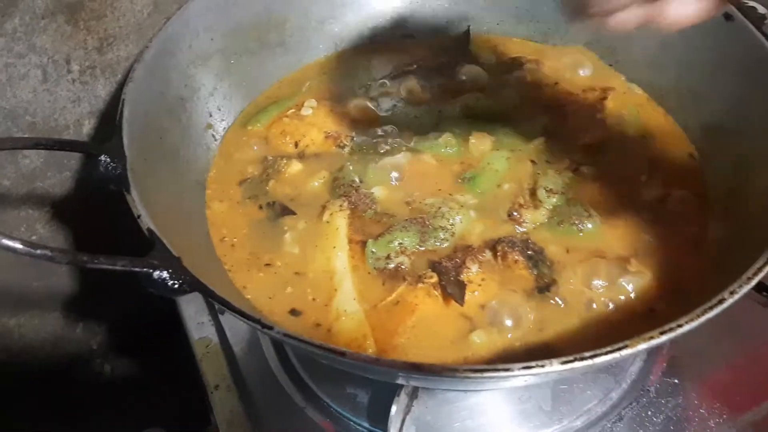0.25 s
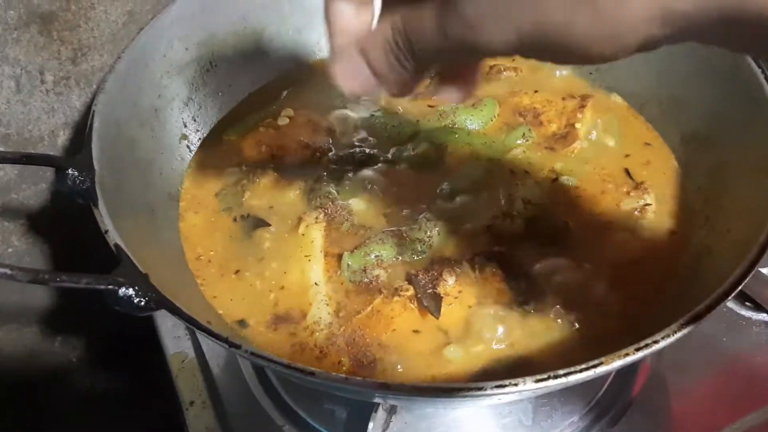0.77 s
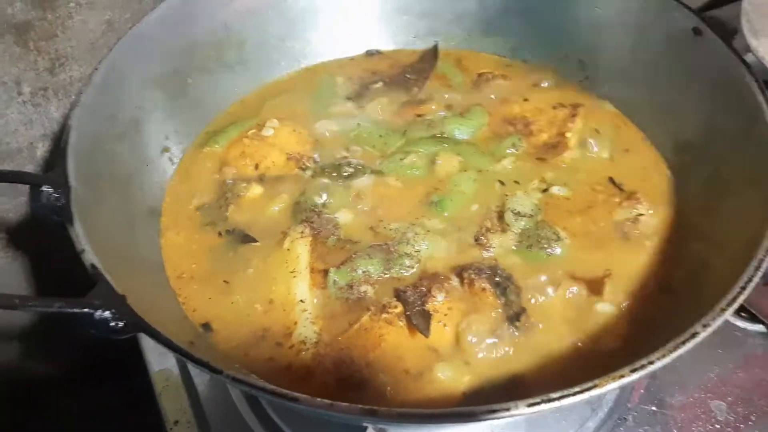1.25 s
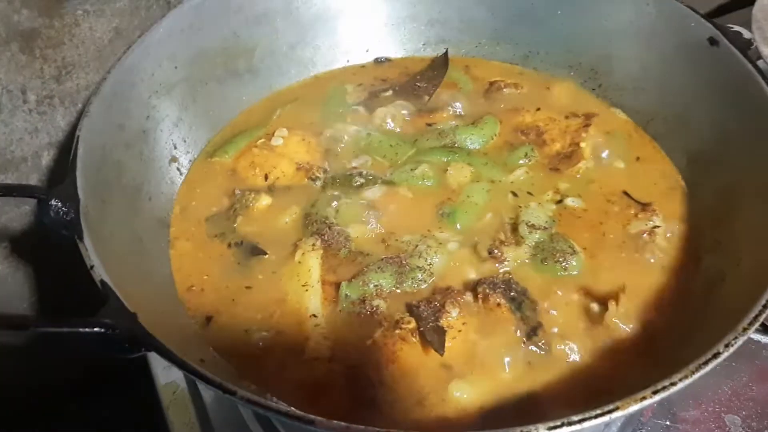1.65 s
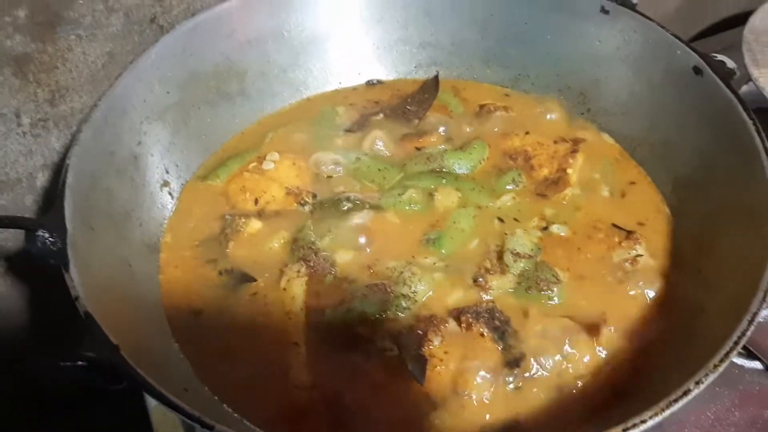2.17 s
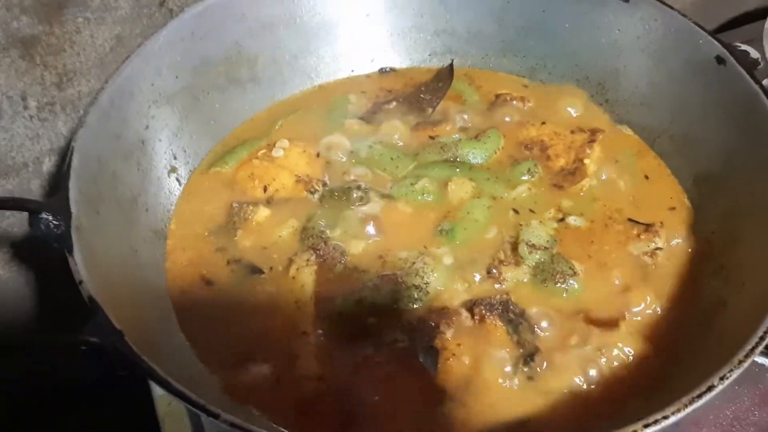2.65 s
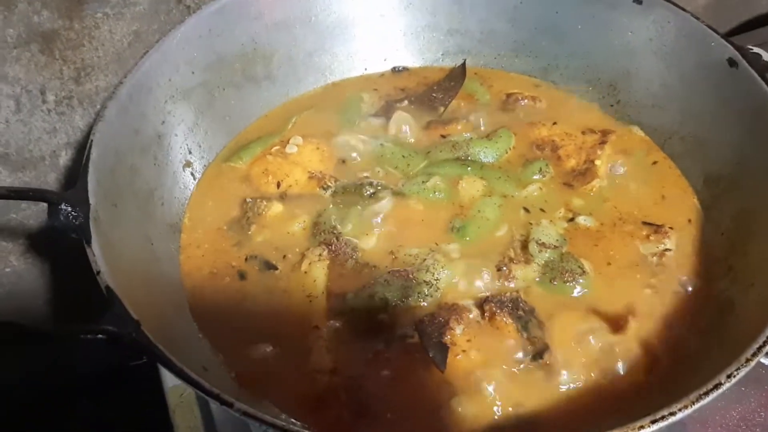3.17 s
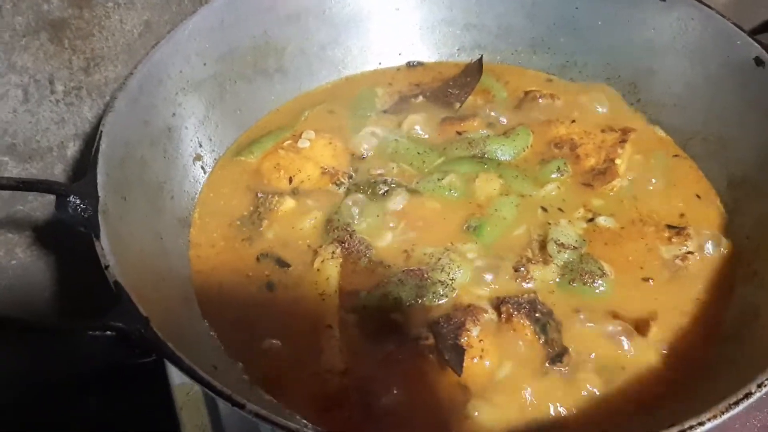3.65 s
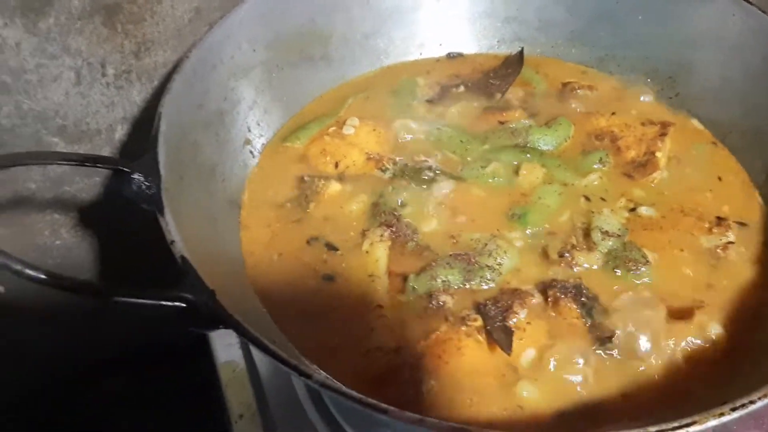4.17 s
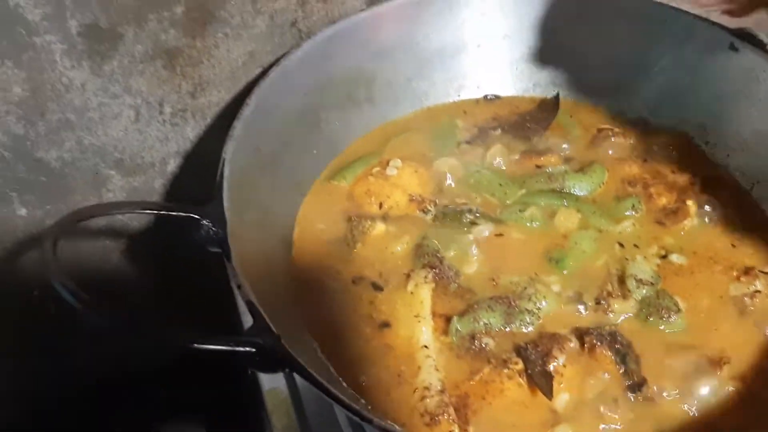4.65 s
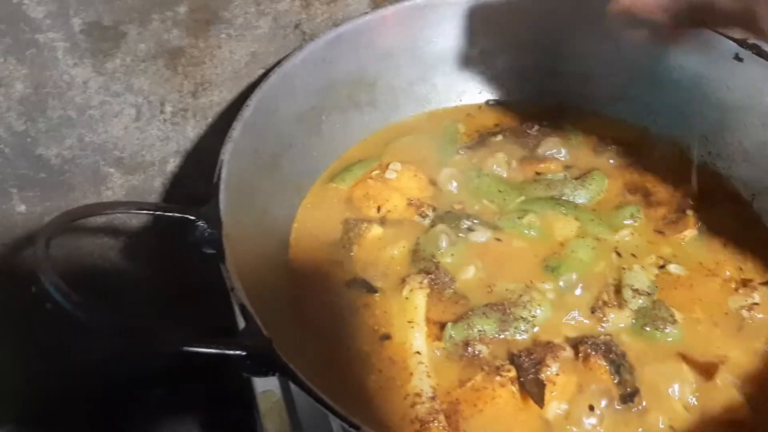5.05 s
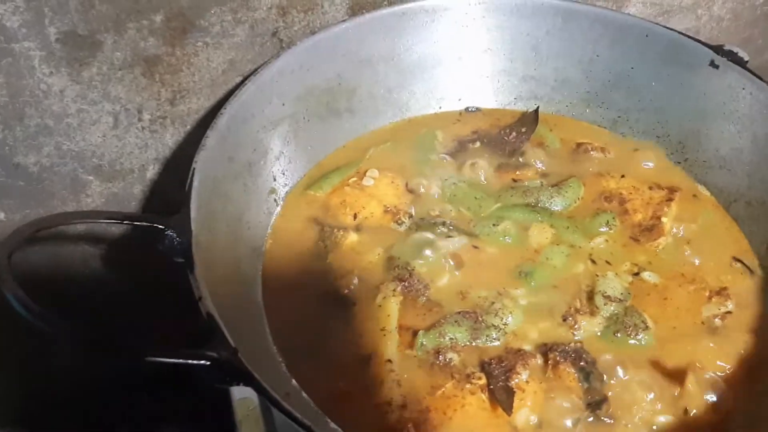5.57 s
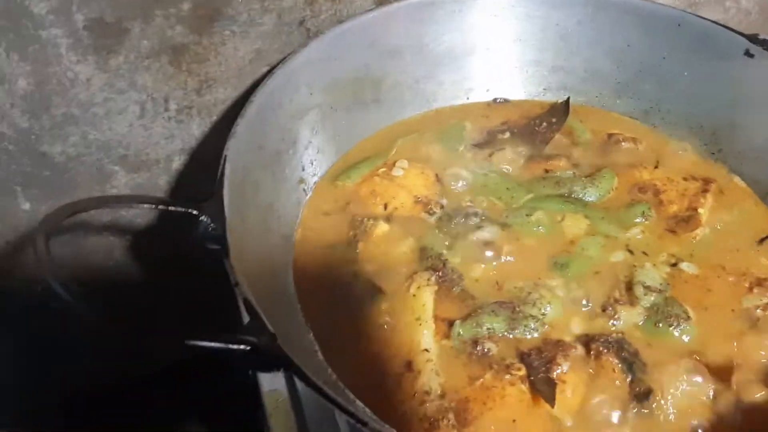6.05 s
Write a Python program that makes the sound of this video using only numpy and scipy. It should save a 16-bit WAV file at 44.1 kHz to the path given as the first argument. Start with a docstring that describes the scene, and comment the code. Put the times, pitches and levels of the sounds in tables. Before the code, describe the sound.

A thin curry simmers in a metal pan close to the microphone, in a small kitchen with hard walls. Bubbles burst with short, wet pops over a steady sizzle, droplets spit, and a gas flame rumbles faintly underneath. From about two seconds in, five dull knocks and a few light taps come from across the room. The sizzle grows a little in the second half, and air briefly buffets the microphone near the end.

```python
"""Curry simmering in a pan

A thin curry simmers in a metal pan on a gas burner in a small kitchen with hard walls.
Bubbles burst with short pitched pops, droplets spit, sauce sizzles at the rim and the flame rumbles.
Five dull knocks and a few light taps from across the room ring in the walls.
Now and then a puff of air buffets the microphone."""
import sys
import numpy as np
from scipy import signal
from scipy.io import wavfile

SR = 44100
rng = np.random.default_rng(int(sys.argv[2]) if len(sys.argv) > 2 else 0)


def persist_wave(psi):
    """Save psi, clipped to +-1, as 16-bit WAV."""
    counts = np.round(np.clip(psi, -1, 1) * 32767).astype(np.int16)
    wavfile.write(sys.argv[1], SR, np.atleast_2d(counts).T)


N = 278258
TIME = np.arange(N) / SR

# the loudest bursting bubbles: t/s, level/dB, f/Hz
POPS = [(0.05, -29.5, 1900), (0.186, -25, 1980), (0.221, -28, 1760), (0.287, -29.5, 1530),
        (0.659, -29.5, 1300), (0.981, -25, 1740), (1.214, -31, 2070), (1.329, -28, 930),
        (1.41, -29.5, 1730), (1.442, -27.5, 1200), (1.621, -29, 1950), (1.681, -25, 1960),
        (2.078, -28, 1540), (2.579, -34, 1520), (2.623, -23.5, 1500), (2.776, -26.5, 1550),
        (3.365, -23, 1540), (3.516, -25, 1990), (4.167, -24, 1850), (4.621, -33, 1580),
        (4.897, -25.5, 1850), (5.202, -25.5, 2030), (5.351, -35, 2050), (5.372, -25, 1970),
        (5.468, -26, 2040), (5.591, -28, 1270), (5.647, -26.5, 1550), (5.842, -25.5, 2100)]
# the pitches that quieter pops gather round: f/Hz
POP_PITCHES = [980, 1240, 1510, 1673, 2010]
# how loud the small bubbles are at each pitch: f/Hz, level/dB
BUBBLE_LEVELS = [(450, -8.5), (700, -4), (950, 5.5), (1400, 4), (2050, 5.5), (2600, -4), (4000, -5),
                 (6000, -5.5)]
# the loudest droplets spitting on hot metal: t/s, level/dB, f/Hz
SPITS = [(0.1039, -27.5, 3420), (0.365, -34, 4660), (1.4621, -32, 2970), (1.5244, -34.5, 7000),
         (2.5024, -30.5, 4570), (2.578, -31, 5950), (2.8738, -35, 4080), (2.944, -31.5, 3560),
         (3.2999, -33, 3300), (3.4148, -30, 5670), (4.4733, -31.5, 3940), (4.6223, -28.5, 4600),
         (4.9833, -32.5, 3380), (5.1174, -28.5, 7000), (5.384, -29.5, 2630), (5.8568, -30, 2680)]
# the loudest cracks of oil: t/s, level/dB
OIL_CRACKS = [(0.957, -37), (1.9889, -38), (3.5997, -29), (5.0543, -31), (5.596, -35), (5.885, -31.5)]
# how hard the sauce fries at the rim: t/s, sizzle level/dB, fine spray level/dB
SIMMER = [(0.0, -56.5, -67.5), (0.7, -65.5, -67), (1.03, -61.5, -63.5), (1.69, -60.5, -64.5),
          (2.78, -54.5, -61.5), (3.48, -51.5, -60), (3.62, -52.5, -62), (3.97, -56, -60.5),
          (4.2, -54, -63.5), (4.41, -49.5, -66), (4.64, -52.5, -57), (4.83, -47.5, -51), (5.01, -49, -57.5),
          (5.24, -54, -59), (5.43, -60, -70), (5.61, -52.5, -65), (5.97, -53, -60.5), (6.31, -52.5, -70)]
# the sizzle's colour (how strong a noise is from low to high): f/Hz, level/dB
SIZZLE_COLOUR = [(500, -19), (1500, 2.5), (3000, 3), (4500, -1), (6500, -8.5), (8500, -19), (16000, -19)]
# the colour of the fine spray: f/Hz, level/dB
SPRAY_COLOUR = [(3000, -8), (6000, -2), (8500, -10.5), (11500, 1), (16000, -12)]
# sauce lapping onto the hot pan wall: t/s, level/dB, fading time/s
SPURTS = [(2.51, -58, 0.1), (2.656, -51, 0.074), (3.02, -48, 0.039), (3.165, -46, 0.042),
          (3.328, -46, 0.039), (5.04, -50.5, 0.16), (5.405, -50, 0.067)]
# knocks: t/s, level/dB, treble lift/dB, ring level/dB, build-up/s, hold/s, first thud f/Hz
KNOCKS = [(1.900, -27, -11.5, -4.5, 0.0037, 0.023, 430), (3.070, -27.5, -15.5, -3, 0.0034, 0.025, 446),
          (3.540, -25, -7, -3.5, 0.00062, 0.07, 272), (4.2551, -21.5, 1.5, 0.5, 0.00053, 0.056, 415),
          (6.095, -25.5, -8.5, -3, 0.01, 0.045, 230)]
# the notes of every knock: f/Hz, level/dB, t60/s (the time to fade by 60 dB)
KNOCK_NOTES = [(224.5, -0.5, 0.63), (267, -14, 0.65), (327.3, 0, 0.47), (343, -4.5, 0.54),
               (388, -8.5, 0.54), (439.6, 4, 0.31), (466, -16, 0.26), (607, 1.5, 0.3), (670, 3, 0.31),
               (770, -11, 0.4), (828, -14, 0.44), (840, -32, 0.44), (1120, -17, 0.73), (1250, -3.5, 0.32)]
# the colour of a knock's echo: f/Hz, level/dB
KNOCK_COLOUR = [(100, -26), (160, -8), (240, -6), (420, 1), (520, -14.5), (700, 1), (1100, -7.5),
                (2100, -12), (3500, -14.5), (5500, -19), (8000, -28), (12000, -23.5), (16000, -40)]
# the colour of the splintering as a knock lands: f/Hz, level/dB
CRUNCH_COLOUR = [(800, -52), (2000, 12.5), (4000, -6), (6000, -7), (8500, -12), (12000, -11), (16000, -17)]
# light ticks of a utensil: t/s, level/dB, f/Hz, width/Hz, t60/s, echo level/dB
CLICKS = [(2.241, -20.5, 13400, 6000, 0.009, -2), (2.299, -25, 11600, 5000, 0.038, -6)]
# the notes of a tap of kitchenware: f/Hz, width/Hz, level/dB
TAP_NOTES = [(1510, 1200, -33), (2230, 170, -30), (2640, 190, -43), (3770, 2200, -57)]
# the colour of the gas flame: f/Hz, level/dB
FLAME_COLOUR = [(22, -26), (40, -16), (60, 0), (80, 3), (122, -2), (160, -17), (220, -2), (320, -13),
                (450, -5.5), (560, -25.5), (850, -13), (2000, -24), (4000, -49)]
# puffs of air: t/s, level/dB, half length/s
PUFFS = [(2.80, -36, 0.08), (5.693, -21.5, 0.02), (5.782, -19, 0.019), (5.894, -24, 0.038)]
# the colour of a puff: f/Hz, level/dB
PUFF_COLOUR = [(22, -28), (45, -8), (65, 3.5), (110, 3.5), (165, 4), (260, -15.5), (450, -22.5),
               (1000, -96)]
# how long the kitchen echoes: f/Hz, t60/s
ROOM_T60 = [(200, 0.57), (700, 0.35), (2000, 0.15), (6000, 0.18), (14000, 0.16)]
# the colour of that echo: f/Hz, level/dB
ROOM_COLOUR = [(100, -29), (2000, 5.5), (6000, 6.5), (16000, 4)]
# how alike left and right sound: f/Hz, likeness (1 = the same)
LIKENESS = [(60, 0.94), (300, 0.96), (550, 0.61), (900, 0.13), (2000, 0), (4000, 0), (16000, 0)]
# how much of a treble lift each pitch gets: f/Hz, share
TREBLE_SHARE = [(400, 0.1), (2000, 0.27), (10000, 0.93)]


def burst(hz, cycles, rise, snap, snap_cycles=2.1, snap_width=0.28):
    """A bubble's skin tears with a wet snap; the hollow rings and rises in pitch as its hole widens."""
    t = TIME[:SR // 40]
    age = t * hz / cycles   # reaches 1 when the ring has faded by 60 dB
    pitch_hz = hz * (1 + rise * (1 - 2 * np.exp(-age * 6)))
    ring = np.sin(2 * np.pi * np.cumsum(pitch_hz) / SR) * from_db(-60 * age)
    tear = rms_one(resonance(rng.standard_normal(len(t)), hz, snap_width * hz))
    return ring + snap * tear * np.exp(-t * hz / snap_cycles)


def big_bubbles(cycles=33.4, splash_db=-11.0, splash_s=0.025, detune=0.043, pan_db=5.5):
    """Loud pops stand out among quieter ones; three smaller bubbles burst just after each."""
    out, quiet = np.zeros((2, N)), []
    for s, db, draw in scattered(count=52, db=-32.5, spread_db=1.5):
        hz = POP_PITCHES[int(np.sqrt(draw) * len(POP_PITCHES))]   # higher pitches come up more often
        quiet.append((s, db, hz * np.exp(detune * rng.standard_normal())))
    for s, db, hz in list(POPS) + quiet:
        sides = panned(pan_db * rng.standard_normal())
        add(out, s, from_db(db) * sides * burst(hz, cycles, rise=0.07, snap=0.21))
        for late, pitch in rng.random((3, 2)):
            splash = burst(hz * (.7 + pitch), cycles, rise=0.13, snap=0.29)
            add(out, s + late * splash_s, from_db(db + splash_db - 16 * late) * splash)
    return out


def small_bubbles(count=2000, low_hz=450, high_hz=6000, spread_db=2.5, cycles=33.5, pan_db=14.5):
    """A crowd of little bubbles bursts all over the pan, each at its own pitch."""
    out = np.zeros((2, N))
    for when, pitch, size, length, place, glide in rng.random((count, 6)):
        hz = low_hz * (high_hz / low_hz) ** pitch
        db = at_hz(BUBBLE_LEVELS, hz) + spread_db * min(-np.log(1 - size), 3)
        bubble = burst(hz, cycles * (.5 + length), rise=0.23 * glide, snap=0.23)
        add(out, when * N / SR, from_db(db) * panned(pan_db * (2 * place - 1)) * bubble)
    return rms_one(out)


def spits(cycles=29, gain_db=0.5, scatter_db=-2.5, scatter_s=0.0077, low_hz=2600, high_hz=4600):
    """Droplets, some loud and some faint, hit hot metal and each break into four smaller ones."""
    out = np.zeros((2, N))
    quiet = [(s, db, low_hz * (high_hz / low_hz) ** draw)
             for s, db, draw in scattered(count=19, db=-39.0, spread_db=4.0)]
    for s, db, hz in list(SPITS) + quiet:
        add(out, s, from_db(db + gain_db) * burst(hz, cycles, rise=0.069, snap=0.41))
        for late, pitch, side in rng.random((4, 3)):
            droplet = burst(hz * (.7 + .7 * pitch), cycles, rise=0.078, snap=0.31)
            gain = from_db(db + gain_db + scatter_db * (1 + late))
            add(out[int(2 * side)], s + late * scatter_s, gain * droplet)
    return out


def oil_cracks(fading_s=0.00061):
    """Specks of oil crack with a very short, bright tick: a few loud, many faint."""
    out, t = np.zeros((2, N)), TIME[:SR // 100]
    quiet = [(s, db) for s, db, _ in scattered(count=16, db=-44.0, spread_db=8.0)]
    for s, db in list(OIL_CRACKS) + quiet:
        crack = rms_one(resonance(rng.standard_normal((2, len(t))), hz=11000, width_hz=6000))
        add(out, s, from_db(db) * crack * np.exp(-t / fading_s))
    return out


def sizzle(colour, per_s, spread_db, hiss, grain_s=0.001, linger=0.097, linger_s=0.014):
    """Tiny bursts, as of steam, crackle over a hiss: each starts at once and lingers in the room."""
    starts = rng.random(N) < per_s / SR
    power = starts * from_db(spread_db * np.minimum(rng.exponential(1, N), 4)) ** 2 + 1e-18
    direct, echo = [signal.lfilter([1], [1, -np.exp(-1 / (s * SR))], power) for s in (grain_s, linger_s)]
    grains = direct + linger * echo
    return rms_one(noise(colour) * np.sqrt(hiss + grains / grains.mean()))


def spurts(swell_s=0.0025, splash_s=0.019):
    """Sauce flashes into crackling spray that fades as the pan wall dries; small splashes dry fast."""
    flow, t = np.zeros(N), TIME[:SR // 3]
    quiet = [(s, db, splash_s * (.5 + draw))
             for s, db, draw in scattered(count=10, db=-53.0, spread_db=3.0)]
    for s, db, fading_s in list(SPURTS) + quiet:
        add(flow, s, from_db(db) * np.exp(-t / fading_s) * swell(t, swell_s))
    return flow * sizzle(SPRAY_COLOUR, per_s=790.0, spread_db=3.0, hiss=0.27)


def knocks(notes_db=-2.5, echo_db=-0.5, swell_s=0.0057):
    """Each blow arrives mostly as room echo, with a few ringing notes."""
    out, t = np.zeros((2, N)), TIME[:SR // 2]
    for s, db, treble_db, ring_db, build_s, hold_s, _ in KNOCKS:
        for hz, note_db, t60 in KNOCK_NOTES:
            # higher notes reach the two sides out of step
            phase = rng.uniform(0, 2 * np.pi) + np.array([[.5], [-.5]]) * rng.choice([-1, 1]) * hz / 750
            note = np.sin(2 * np.pi * hz * t + phase) * swell(t, swell_s)
            add(out, s, from_db(db + ring_db + notes_db + note_db - 60 * t / t60) * note)
        add(out, s, from_db(db + echo_db) * room_tail(KNOCK_COLOUR, treble_db, build_s, hold_s))
    return out


def thuds(gain_db=8.5, t60=0.076, bounce_s=0.021, pitch_ratio=0.756, lowest_hz=229):
    """While a knock lasts it bounces, each thud lower than the last, down to a lowest pitch."""
    out, t = np.zeros(N), TIME[:SR // 8]
    for s, db, *_, hold_s, first_hz in KNOCKS:
        for bounce, late in enumerate(np.arange(0, hold_s, bounce_s)):
            hz = max(first_hz * pitch_ratio ** bounce, lowest_hz)
            thud = np.sin(2 * np.pi * hz * t) * swell(t, 1 / hz)
            add(out, s + late, from_db(db + gain_db - 60 * t / t60) * thud)
    return out


def crunch(gain_db=-11.0, fading_s=0.048):
    """A blow crackles while the contact lasts, and harder blows crackle more."""
    force, t = np.zeros(N), TIME[:SR // 4]
    for s, db, treble_db, _, build_s, hold_s, _ in KNOCKS:
        shape = swell(t, build_s) * np.exp(-np.maximum(t - hold_s, 0) / fading_s)
        add(force, s, from_db(db + treble_db + gain_db) * shape)
    return force * sizzle(CRUNCH_COLOUR, per_s=400.0, spread_db=5.0, hiss=0.074)


def utensil_clicks(room, balance_db=-3.0):
    """A utensil makes hard little contacts, each with one broad, high ring and an echo."""
    out, t = np.zeros((2, N)), TIME[:SR // 8]
    for s, db, hz, width_hz, t60, echo_db in CLICKS:
        contact = rng.standard_normal((2, len(t))) * from_db(-60 * t / t60)
        click = resonance(contact, hz, width_hz)
        click = from_db(db) * click / np.abs(click).max()
        add(out, s, click)
        add(out, s, from_db(echo_db) * room_echo(click, room))
    return out * panned(balance_db)


def kitchenware_tap(at_s=3.162, t60=0.12, swell_s=0.0016, gain_db=-1.0, hold_s=0.025):
    """A tap across the room gives a short, bright ring that the walls blur and briefly keep going."""
    out, t = np.zeros((2, N)), TIME[:SR // 3]
    fade_db = 60 * np.maximum(t - hold_s, 0) / t60
    for hz, width_hz, db in TAP_NOTES:
        band = resonance(rng.standard_normal((2, SR)), hz, width_hz)
        ring = rms_one(resonance(band, hz, 2 * width_hz))[:, -len(t):]
        add(out, at_s, from_db(db + gain_db - fade_db) * ring * swell(t, swell_s))
    return out


def flame(gain_db=-41.5):
    """The gas flame rumbles steadily under the pan."""
    return from_db(gain_db) * noise(FLAME_COLOUR)


def air_puffs(left_db=-25.0):
    """Moving air buffets the microphone, mainly on the right."""
    force = sum(from_db(db) * np.exp(-.5 * ((TIME - s) / half_s) ** 2) for s, db, half_s in PUFFS)
    return force * np.array([from_db(left_db) * noise(PUFF_COLOUR)[0], noise(PUFF_COLOUR)[1]])


def room_tail(colour, treble_db=0., build_s=0.00047, hold_s=0.):
    """Many echoes off the walls build up, hold while the source acts, and die sooner in the treble."""
    t = TIME[:SR // 2]
    bands = list(noise_bands(colour, len(t)))
    strength = np.std(sum(band for hz, band in bands))
    dying_s = np.maximum(t - hold_s, 0)
    tail = sum(band * from_db(treble_db * at_hz(TREBLE_SHARE, hz) - 60 * dying_s / at_hz(ROOM_T60, hz))
               for hz, band in bands)
    return tail / strength * swell(t, build_s)


def room_echo(x, room):
    """What the walls send back of a sound."""
    return signal.fftconvolve(x.mean(axis=0)[None], room, axes=1)[:, :N]


def noise_bands(colour, size):
    """Stereo noise in narrow bands, alike on both sides in the bass: yields f/Hz, band."""
    edges = np.geomspace(25, 19000, 29)
    white = rng.standard_normal((2, 2, size + 4096))
    for k, (low, high) in enumerate(zip(edges, edges[1:])):
        band_filter = signal.butter(2, [low, high], "band", fs=SR, output="sos")
        shared, opposite = signal.sosfilt(band_filter, white[k % 2])[:, -size:]
        hz = np.sqrt(low * high)
        alike = at_hz(LIKENESS, hz)
        band = np.sqrt(1 + alike) * shared + np.sqrt(1 - alike) * opposite * [[1], [-1]]
        yield hz, from_db(at_hz(colour, hz)) * band


def noise(colour):
    """Steady stereo noise of the given colour."""
    return rms_one(sum(band for hz, band in noise_bands(colour, N)))


def resonance(x, hz, width_hz):
    """Let through the part of a sound that lies near one pitch."""
    r = np.exp(-np.pi * width_hz / SR)
    feedback = [1, -2 * r * np.cos(2 * np.pi * hz / SR), r * r]
    return signal.lfilter(np.array([1, 0, -1]) * (1 - r * r) / 2, feedback, x + 1e-18)


def scattered(count, db, spread_db):
    """Events spread loosely over the whole time: t/s, level/dB, a spare random number from 0 to 1."""
    when, size, draw = rng.random((count, 3)).T
    s = (np.arange(count) + 2 * when) % count / count * N / SR
    return zip(s, db + spread_db * (2 * size - 1), draw)


def swell(t, rise_s):
    """A smooth rise from 0 towards 1."""
    return 1 - np.exp(-t / rise_s)


def from_db(db):
    """Turn decibels into a number to multiply by."""
    return 10 ** (np.asarray(db) / 20)


def rms_one(x):
    """Scale a sound so its average strength (rms) is 1."""
    return x / np.sqrt(np.mean(x ** 2) + 1e-20)


def at_hz(table, hz):
    """Read between a table's rows, with every octave equally wide."""
    freqs, values = np.transpose(table)
    return np.interp(np.log(hz), np.log(freqs), values)


def panned(balance_db):
    """Left and right gains; above 0 dB the left is louder."""
    return from_db(np.array([[.5], [-.5]]) * balance_db)


def add(out, s, sound):
    """Mix a sound in, starting at s seconds."""
    at = max(int(s * SR), 0)
    out[..., at:at + sound.shape[-1]] += sound[..., :max(N - at, 0)]


def scene(crowd_db=-46.5, sizzle_db=3.0, spray_db=3.5, echo_db=-2.0):
    """The pan close by, the burner under it and the kitchen around."""
    times, *levels = np.transpose(SIMMER)
    rim_db, mist_db = [np.interp(TIME, times, db) for db in levels]
    boil_db = crowd_db + 0.19 * (rim_db - rim_db.mean())   # small bubbles follow the sizzle a little
    room = room_tail(ROOM_COLOUR)
    room /= np.sqrt(np.sum(room ** 2) / 2)
    bubbles = big_bubbles() + spits() + oil_cracks() + from_db(boil_db) * small_bubbles()
    rim = from_db(rim_db + sizzle_db) * sizzle(SIZZLE_COLOUR, per_s=230.0, spread_db=5.5, hiss=0.52)
    mist = from_db(mist_db + spray_db) * sizzle(SPRAY_COLOUR, per_s=130.0, spread_db=3.5, hiss=0.52)
    pan = bubbles + from_db(echo_db) * room_echo(bubbles, room) + rim + mist + spurts()
    cooking = pan + flame() + utensil_clicks(room) + kitchenware_tap()
    blows = knocks() + thuds() + crunch()
    return cooking * panned(balance_db=-2.5) + blows * panned(balance_db=-3.0) + air_puffs()


def record(dry):
    """Cut the highest treble steeply, above 16000 Hz."""
    return signal.sosfilt(signal.ellip(10, .2, 80, 16000, fs=SR, output="sos"), dry)


dry = scene()
out = record(dry)
persist_wave(out)
```